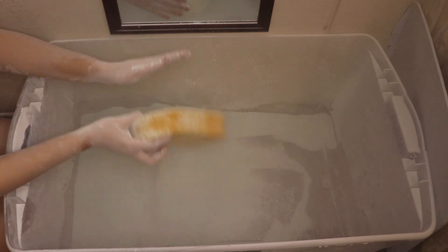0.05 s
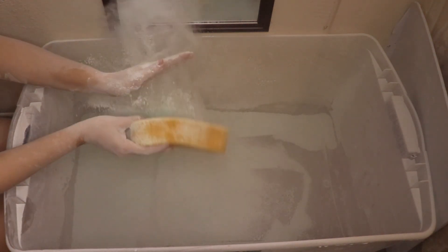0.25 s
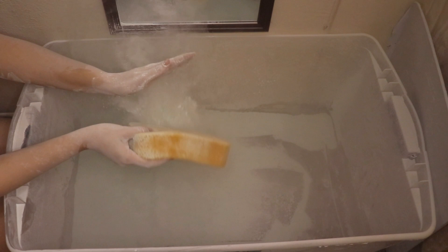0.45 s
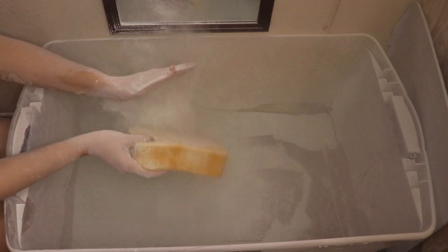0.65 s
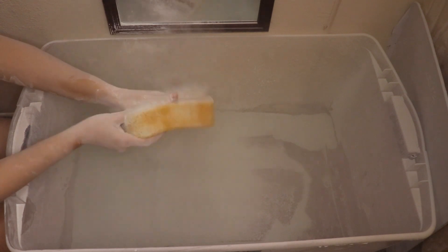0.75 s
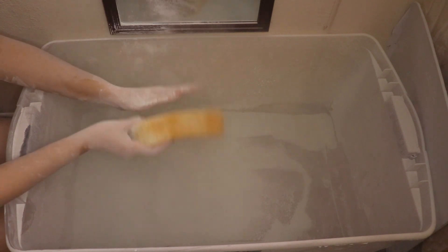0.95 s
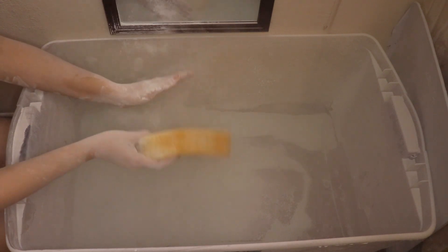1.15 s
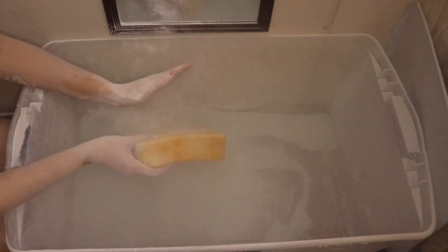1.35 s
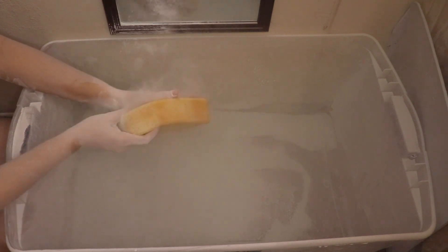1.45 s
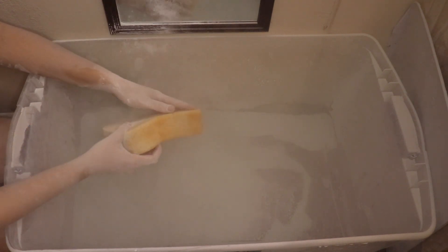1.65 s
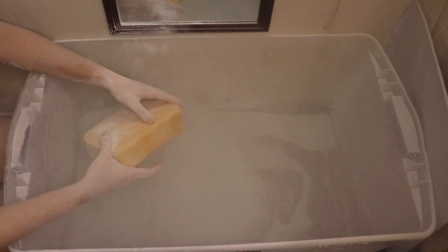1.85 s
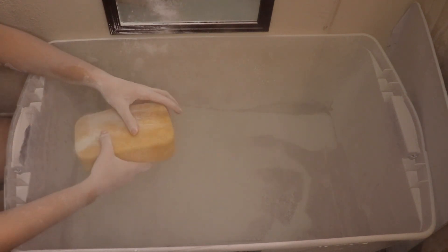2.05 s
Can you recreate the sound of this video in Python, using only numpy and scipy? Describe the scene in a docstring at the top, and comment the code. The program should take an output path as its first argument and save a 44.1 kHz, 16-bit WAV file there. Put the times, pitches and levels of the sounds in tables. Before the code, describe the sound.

A hand pats a powdery sponge seven times, making dull thumps with faint puffs.

```python
"""A dry crackle and a hiss of powder as a hand lifts a powder-filled sponge; then seven pats on it.
The place is a small room, the sponge held over a plastic bin, close to the microphone.
Each pat is a dull push of air with a light slap of skin; the bin rings briefly and powder puffs out.
At the end the hands rub the sponge softly. Low room tone lies under it all."""
import sys
import numpy as np
from scipy import signal
from scipy.fft import rfft, irfft, next_fast_len
from scipy.io import wavfile
from scipy.ndimage import uniform_filter1d

SR = 44100
rng = np.random.default_rng(int(sys.argv[2]) if len(sys.argv) > 2 else 0)


def waveform_to_disk(signal):
    """Save audio, clipped to [-1, 1], as 16-bit WAV at the path in sys.argv[1]."""
    frames = np.transpose(np.atleast_2d(signal))
    scaled = np.clip(frames, -1, 1) * 32767
    samples = np.round(scaled).astype(np.int16)
    wavfile.write(sys.argv[1], SR, samples)


N = 92610

# the pats (time [s], thump [dB], push length [ms], knock [dB], knock tilt [dB/octave], bin ring [dB],
# slap [dB], crack [dB], puff [dB], pop of trapped air [Hz], pop [dB])
PATS = [(0.2354, -14.5, 1.38, -15.5, -0.5, -35, -24.5, -27, -31.5, 800, -27.5),
        (0.4558, -15.5, 1.65, -10.5, -58, -28.5, -46, -35.5, -39.5, 1747, -43),
        (0.661, -11, 1.5, -15.5, 4, -21, -24, -36.5, -39.5, 720, -21),
        (0.8908, -11, 1.09, -26, 0.5, -24.5, -28, -36.5, -34.5, 1165, -25),
        (1.1130, -9.5, 1.24, -30.5, -3, -21, -30, -30, -38, 710, -25),
        (1.334, -12.5, 1.24, -11.5, -13, -29, -36, -36, -40, 1200, -31),
        (1.5633, -7.5, 0.89, -12, 2, -26.5, -27, -25, -40.5, 1187, -24)]
# weak echoes of the push off the bin's walls (delay [s], gain [ratio])
BIN_ECHOES = [(.0079, .15), (0.0115, .3), (0.0164, .16)]
# modes (frequency [Hz], level [dB], t60 [s])
KNOCK_MODES = [(260, 7.5, 0.028), (348.6, -2, 0.064), (409, -1.5, 0.055)]  # hollow knock of the sponge between the hands
BIN_MODES = [(147.7, -1.5, 0.19), (188, -5.5, 0.17), (307, 3.5, 0.12), (375.5, -4, 0.13), (439, -2.5, 0.09),
             (619, -10, 0.071), (830, -21, 0.035), (914, -12, 0.059), (1213, -15.5, .08), (1280, -39, 0.1)]
# crackles of the sponge under the fingers (time [s], level [dB])
CRACKLES = [(0.0425, -27), (0.306, -48)]
# handling strokes (start [s], rise [s], hold [s], release [s], level [dB])
POWDER_SLIDES = [(.045, 0.069, 0.005, 0.02, -45.5), (.125, 0.039, 0.02, 0.059, -43)]  # powder shifts as the sponge moves
SKIN_BRUSHES = [(-.02, 0.026, 0.035, 0.12, -52), (.51, 0.042, 0.026, 0.05, -52),
                (.715, 0.026, 0.021, 0.019, -56.5), (.93, 0.027, 0.024, 0.017, -62),
                (1.39, 0.0068, 0.027, 0.043, -61.5)]  # skin brushes the sponge
SPONGE_TURNS = [(1.81, 0.036, 0.069, 0.067, -66.5), (1.94, 0.085, 0.017, 0.073, -61.5)]  # the sponge turns in the hands
AIR_WAFTS = [(.09, .03, .08, .03, -48.5), (.28, .03, .07, .03, -45.5), (1.9, 0.019, 0.034, 0.038, -54.5)]  # the swung sponge stirs the air
# noise spectra (frequency [Hz], relative level [dB])
PALM_SPECTRUM = [(200, -2.5), (450, 1), (560, -5.5), (680, 5), (920, -8.5), (1040, 0), (1200, -18.5),
                 (1500, -15), (3000, -40.5)]
FINGER_SPECTRUM = [(600, -5), (1300, 13), (1900, 10.5), (3000, 2.5), (4500, -8.5), (9000, -90)]
POWDER_SPECTRUM = [(20, -59), (1000, -26.5), (3000, 6.5), (5000, 9), (7500, 6), (10500, -5.5)]
SQUEEZE_SPECTRUM = [(20, -38), (60, 0.5), (150, -10.5), (400, -22), (1000, -19), (3000, -27.5),
                    (10000, -38)]  # air squeezed out as the hand lands
CRACKLE_SPECTRUM = [(200, -1.5), (900, -8.5), (2000, -3), (3200, -6.5), (5000, -11), (8000, -10),
                    (10500, -31)]
SLIDE_SPECTRUM = [(180, -63), (300, -5), (343, -19), (497, -5), (544, -17), (650, -7.5), (1050, -18),
                  (1610, -2), (2560, -5.5), (3010, -0.5), (4050, -8), (6520, -9), (10500, -22.5),
                  (13600, -54), (22000, -120)]
BRUSH_SPECTRUM = [(150, 0.5), (500, 6), (1300, 0.5), (3000, -9.5), (7000, -14.5), (10500, -26)]
TURN_SPECTRUM = [(300, -2), (1200, -2.5), (3000, -5), (7500, -2.5), (10500, -13)]
WAFT_SPECTRUM = [(30, -25), (70, 7.5), (110, 0), (160, -5), (260, -25), (1000, -50)]
ROOM_TONE_SPECTRUM = [(20, -31), (45, -6), (80, -2.5), (115, -10), (170, -13), (260, -24), (450, -21),
                      (650, -29.5), (1000, -36.5), (2000, -41.5), (4000, -39), (8000, -42.5), (10500, -50)]
# decay of the small room (frequency [Hz], t60 [s])
ROOM_DECAY = [(60, 0.21), (140, 0.36), (250, .14), (500, 0.15), (1500, 0.17), (5000, 0.13), (10000, 0.27)]

CONTACT_LAG_S, CONTACT_RISE_S = 0.00061, 0.00043
SLAP_T60, CRACK_T60, PUFF_T60, POP_T60 = 0.05, 0.03, 0.022, 0.028  # s
SQUEEZE_DB, SETTLE_DB = -33.5, -12.5  # against the thump; against the puff
LOW_WET_DB, SKIN_WET_DB, PUFF_WET_DB = -14, -5.5, -3
MIC_LOW_CUT_HZ, TOP_HZ = 70.3, 10750


def pats():
    """Close up, the hand lands: air is pushed out, skin slaps, the bin rings and powder puffs."""
    out, t = np.zeros(N), np.arange(N) / SR
    palm, fingers = noise(PALM_SPECTRUM), noise(FINGER_SPECTRUM)
    powder, air = noise(POWDER_SPECTRUM), noise(SQUEEZE_SPECTRUM)
    for (start, thump_db, length_ms, knock_db, tilt_db, bin_db,
         slap_db, crack_db, puff_db, pop_hz, pop_db) in PATS:
        touch = start + CONTACT_LAG_S
        squeeze = amp(thump_db + SQUEEZE_DB) * air * np.exp(-np.abs(t - start) / 0.0063)
        knock = amp(knock_db) * ring(KNOCK_MODES, start, rise=0.0065, tilt_db=tilt_db)
        low = amp(thump_db) * thump(start, length_ms) + knock
        bin_ring = amp(bin_db) * ring(BIN_MODES, start, rise=0.0092, tilt_db=0)
        pop_tone = np.sin(2 * np.pi * pop_hz * since(touch))
        pop = amp(pop_db) * pop_tone * burst(touch, CONTACT_RISE_S, POP_T60)
        slap = amp(slap_db) * palm * burst(touch, CONTACT_RISE_S, SLAP_T60)
        crack = amp(crack_db) * fingers * burst(touch, CONTACT_RISE_S, CRACK_T60)
        skin = slap + crack
        puff = amp(puff_db) * powder * burst(touch, CONTACT_RISE_S, PUFF_T60)
        settling = amp(puff_db + SETTLE_DB) * powder * burst(touch, rise=0.06, t60=0.27)
        out += squeeze + low + pop + skin + puff + settling + bin_ring
        out += 0.12 * delayed(skin + pop, seconds=0.013)  # strongest early echo
        out += room(amp(LOW_WET_DB) * low + amp(SKIN_WET_DB) * skin + amp(PUFF_WET_DB) * puff)
    return out


def thump(start, length_ms):
    """One smooth push of air, turned into a few low swings by the microphone and echoed by the bin."""
    age = np.arange(SR // 4) / SR * 1000 / length_ms  # in push lengths
    low_cut = signal.butter(4, MIC_LOW_CUT_HZ, 'high', fs=SR, output='sos')
    push = signal.sosfilt(low_cut, age ** 2 * np.exp(-age))
    push /= np.abs(push).max()
    return delayed(push, start) + sum(gain * delayed(push, start + lag) for lag, gain in BIN_ECHOES)


def ring(modes, start, rise, tilt_db):
    """Modes of sponge or bin swell and die, a little differently each time; the tilt is per octave."""
    t = since(start)
    scatter_db = 1.2 * rng.standard_normal(len(modes))
    live = (t > 0) & (t < 0.5)
    age, out = t[live], np.zeros(N)
    for (hz, db, t60), offset_db in zip(modes, scatter_db):
        level_db = db + offset_db + tilt_db * np.log2(hz / modes[0][0])
        out[live] += amp(level_db - 60 * age / t60) * np.sin(2 * np.pi * hz * age)
    return out * (1 - np.exp(-t / rise))


def crackles():
    """Short dry ticks as the grip tightens, with a little of the room behind them."""
    ticks = noise(CRACKLE_SPECTRUM) * sum(amp(db) * burst(s, rise=0.0006, t60=0.018) for s, db in CRACKLES)
    return ticks + amp(-6.5) * room(ticks)


def rubbing(strokes, spectrum, grain_db):
    """Friction noise swells and fades with each stroke; without grain it is a smooth waft of air."""
    t = np.arange(N) / SR
    level = sum(amp(db) * np.interp(t, start + np.cumsum([0, rise, hold, release]), [0, 1, 1, 0])
                for start, rise, hold, release, db in strokes)
    grains = uniform_filter1d(rng.standard_normal(N), size=40)
    hiss = noise(spectrum) * amp(grain_db * grains / grains.std())
    return level * hiss / hiss.std()


def room(x):
    """The small room answers with a short tail, each frequency dying at its own speed."""
    hz, t, bins = signal.stft(rng.standard_normal(SR // 2), SR, nperseg=512)
    decay = amp(-60 * t / along(ROOM_DECAY, hz)[:, None])
    tail = signal.istft(bins * decay, SR, nperseg=512)[1]
    tail *= 1 - np.exp(-np.arange(len(tail)) / SR / .008)  # reflections build up
    return signal.fftconvolve(x, tail / np.linalg.norm(tail))[:N]


def room_tone():
    """The faint, steady rumble of the room."""
    return amp(-54) * noise(ROOM_TONE_SPECTRUM)


def amp(db):
    """Decibels to gain."""
    return 10 ** (np.asarray(db) / 20)


def along(points, hz):
    """Interpolate (frequency [Hz], value) points on a log frequency axis."""
    freqs, values = np.transpose(points)
    return np.interp(np.log(hz + 1), np.log(freqs + 1), values)


def noise(spectrum):
    """Coloured noise of rms 1."""
    size = next_fast_len(N + SR // 4)
    gain = amp(along(spectrum, np.fft.rfftfreq(size, 1 / SR)))
    x = irfft(rfft(rng.standard_normal(size)) * gain, size)[:N]
    return x / x.std()


def since(start):
    """Seconds after start, zero before it."""
    return np.maximum(np.arange(N) / SR - start, 0)


def burst(start, rise, t60):
    """An envelope that rises, then decays exponentially; times in seconds."""
    t = since(start)
    return (1 - np.exp(-t / rise)) * amp(-60 * t / t60)


def delayed(x, seconds):
    """The same signal, arriving later."""
    return np.interp(np.arange(N) - seconds * SR, np.arange(len(x)), x, left=0, right=0)


def scene():
    """At one close microphone: pats in front, soft handling between them, room tone behind."""
    handling = (rubbing(POWDER_SLIDES, SLIDE_SPECTRUM, grain_db=1.5)
                + rubbing(SKIN_BRUSHES, BRUSH_SPECTRUM, grain_db=1.5)
                + rubbing(SPONGE_TURNS, TURN_SPECTRUM, grain_db=2.5))
    sponge = pats() + crackles() + handling
    wafts = rubbing(AIR_WAFTS, WAFT_SPECTRUM, grain_db=0)
    return (sponge + wafts + room_tone())[None]


def record(dry):
    """The microphone's signal loses its top treble in a steep, 200 Hz wide slope."""
    size = next_fast_len(N + SR // 4)
    hz = np.fft.rfftfreq(size, 1 / SR)
    passband = np.clip((TOP_HZ - hz) / 200 + .5, 0, 1)
    return irfft(rfft(dry, size) * passband, size)[:, :N]


dry = scene()
out = record(dry)
waveform_to_disk(out)
```